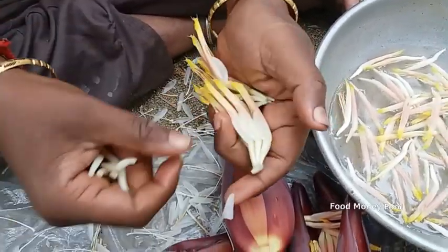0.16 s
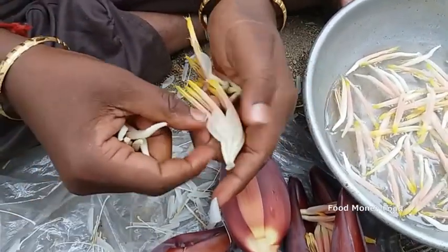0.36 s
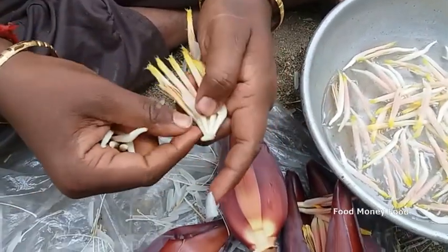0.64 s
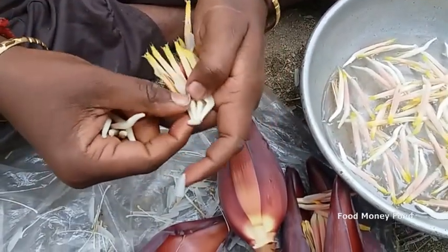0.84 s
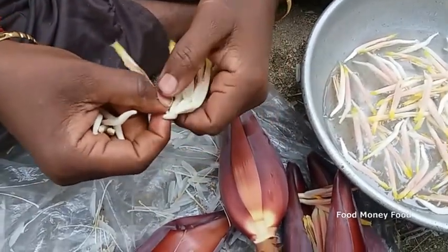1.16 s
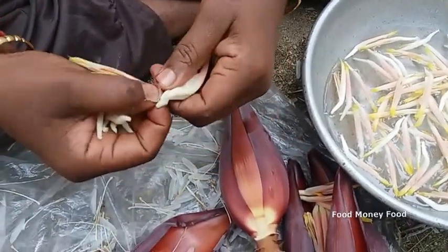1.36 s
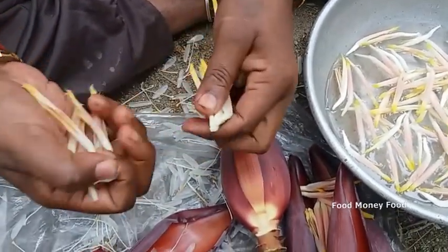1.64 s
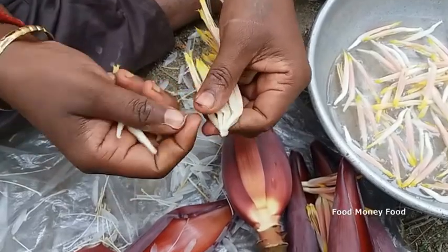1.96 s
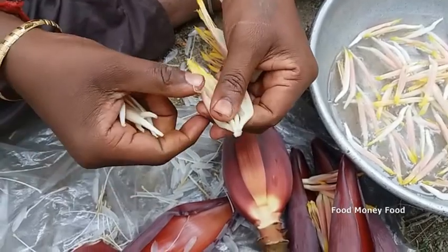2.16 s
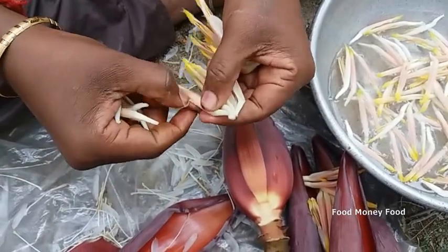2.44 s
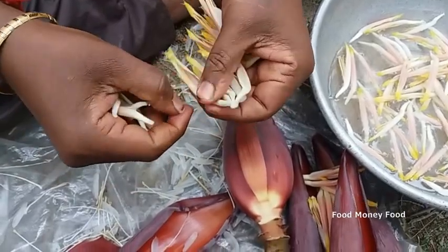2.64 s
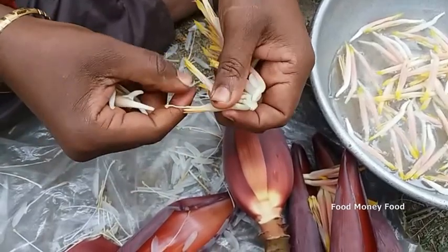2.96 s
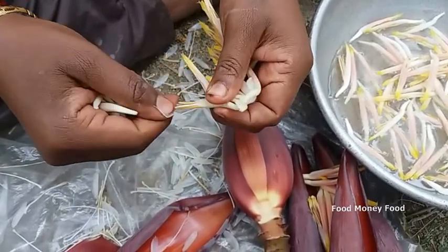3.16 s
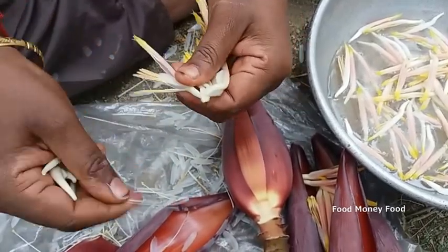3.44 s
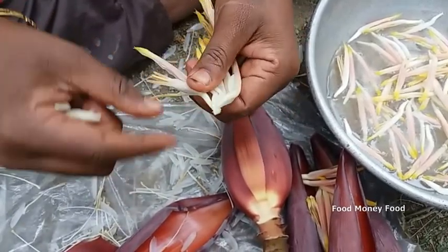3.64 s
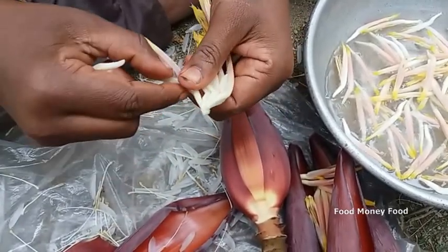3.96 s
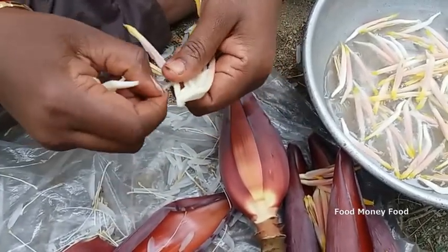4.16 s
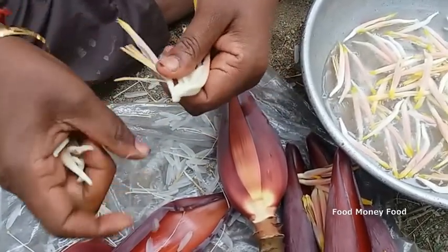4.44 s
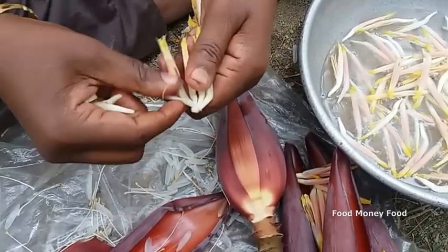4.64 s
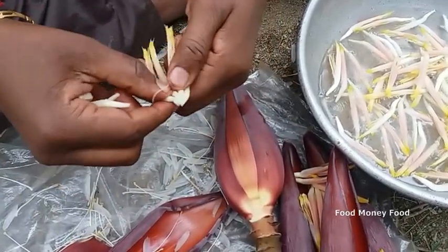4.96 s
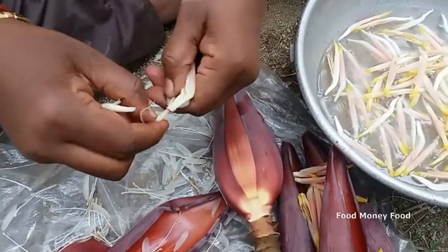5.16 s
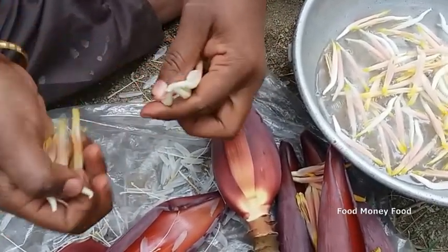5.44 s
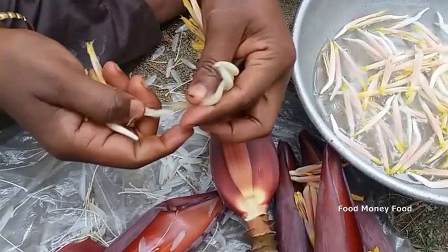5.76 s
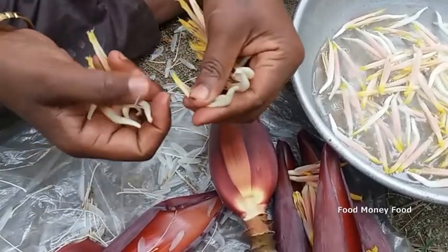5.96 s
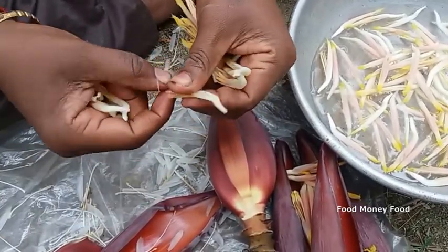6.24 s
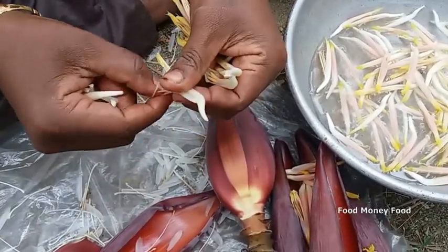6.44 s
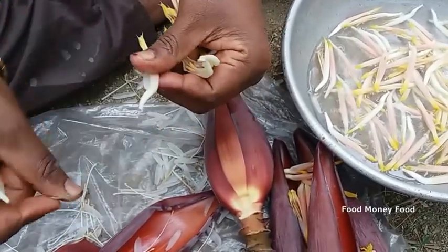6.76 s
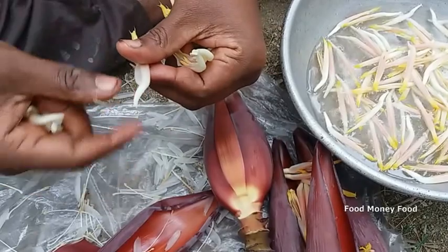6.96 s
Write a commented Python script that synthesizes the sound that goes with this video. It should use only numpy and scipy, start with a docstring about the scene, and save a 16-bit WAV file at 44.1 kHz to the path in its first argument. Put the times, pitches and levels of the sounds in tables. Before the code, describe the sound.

Small wet snaps of flower stalks picked apart by hand, with five raspy crow caws and an engine chugging far off.

```python
"""Outdoors in a yard, hands pick banana florets apart close by: stalks snap wetly and ring for an
instant, petals rub, fingers knock softly. Some way off a crow caws five times, a rasping arched tone
through its throat; a second bird hisses, a third whistles thinly, and all three echo. A distant
single-cylinder engine chugs with exhaust puffs and valve clatter, over open air and a low rumble."""
import sys
import numpy as np
from scipy import signal
from scipy.fft import rfft, irfft, next_fast_len
from scipy.io import wavfile
from scipy.ndimage import uniform_filter1d

SR = 44100
rng = np.random.default_rng(int(sys.argv[2]) if len(sys.argv) > 2 else 0)


def dump_mix(stems):
    """Bounce the given channels to the path in sys.argv[1] as a 16-bit WAV at rate SR."""
    frames = np.atleast_2d(stems).T  # one column per channel
    limited = np.clip(frames, -1, 1)  # hard clip at full scale
    pcm = np.round(limited * 32767).astype(np.int16)
    wavfile.write(sys.argv[1], SR, pcm)


N = 312669
TIME = np.arange(N) / SR


def from_db(db):
    """Decibels to gain."""
    return 10 ** (np.asarray(db) / 20)


def rms_one(x):
    """Scale to unit rms."""
    return x / np.sqrt(np.mean(x ** 2) + 1e-20)


def shaped(x, spectrum):
    """Filter by an (f/Hz, level/dB) table, -40 dB/octave beyond its ends; rms 1."""
    size = next_fast_len(len(x))
    hz, db = np.transpose(spectrum)
    octave = np.log2(np.maximum(np.fft.rfftfreq(size, 1 / SR), 1))
    outside = np.abs(octave - np.clip(octave, np.log2(hz[0]), np.log2(hz[-1])))
    gain = from_db(np.interp(octave, np.log2(hz), db) - 40 * outside)
    return rms_one(irfft(rfft(x, size) * gain, size)[:len(x)])


def coloured(spectrum):
    """Noise of a given spectrum; rms 1."""
    return shaped(rng.standard_normal(N), spectrum)


def drift(rate_hz):
    """Low-passed random wander; rms 1."""
    r = np.exp(-40 * np.pi * rate_hz / SR)  # runs at SR / 20
    slow = signal.lfilter([1], [1, -2 * r, r * r], rng.standard_normal(N // 20 + 2002))[2000:]
    return np.interp(np.arange(N) / 20, np.arange(len(slow)), rms_one(slow))


def ring(x, hz, t60_s):
    """One mode: a unit click starts a decaying sine of height 1."""
    r, w = from_db(-60 / (t60_s * SR)), 2 * np.pi * hz / SR
    return signal.lfilter([0, np.sin(w)], [1, -2 * r * np.cos(w), r * r], x + 1e-18)


def clicks(times_s, gains):
    """One impulse at each time."""
    at = np.round(np.asarray(times_s) * SR).astype(int)
    inside = (at >= 0) & (at < N)
    return np.bincount(at[inside], np.asarray(gains)[inside], N)


def fading(x, fade_s):
    """Each click becomes a decaying envelope."""
    return signal.lfilter([1], [1, -np.exp(-1 / (fade_s * SR))], x + 1e-18)


def note(start_s, length_s, db, change_db, attack_s, release_s):
    """Note envelope: attack, sloping hold, release."""
    t = TIME - start_s
    gate = np.clip(np.minimum(t / attack_s, (length_s - t) / release_s), 0, 1)
    return from_db(db + change_db * np.clip(t / length_s, 0, 1)) * gate


def arc(t, top_s, length_s, first, top, last, rise_power, fall_power):
    """Arch through first, top, last; power 2 is a parabola, higher is flatter."""
    rise = np.maximum(top_s - t, 0) / max(top_s, 1e-3)
    fall = np.maximum(t - top_s, 0) / max(length_s - top_s, 1e-3)
    return top + (first - top) * rise ** rise_power + (last - top) * fall ** fall_power


def background(air_db=-55, rumble_db=-56, treble_db=-66, stir_db=0.78, gust_db=-0.5, flicker_db=1.1):
    """Open air, an uneven low rumble and a thin high hiss."""
    # noise spectra: f/Hz, level/dB
    air_colour = [(150, -3.5), (260, 3), (290, -2), (714, -5.5), (877, -1.5), (913, -7.5), (1030, -6),
                  (1120, -5.5), (1780, -3), (2130, -7), (2720, -4.5), (4160, -12.5), (6800, -23.5),
                  (8840, -83), (15000, -120)]
    rumble_colour = [(30, -38), (42, -11.5), (58, -4), (85, 2.5), (130, -7), (220, -7), (330, -31)]
    treble_colour = [(5500, -25), (6900, -14), (7500, -6.5), (7950, 0), (8500, -7.5), (9200, -15),
                     (10200, -15), (11000, -12.5), (13200, -17.5), (15600, -15)]
    air = from_db(air_db + stir_db * drift(57)) * coloured(air_colour)
    rumble = from_db(rumble_db + gust_db * drift(8.8)) * coloured(rumble_colour)
    treble = from_db(treble_db + flicker_db * drift(17)) * coloured(treble_colour)
    return air + rumble + treble


def each_cycle(cycles_s, offsets_s, levels_db, vary_db, slop_s):
    """A click pattern repeated each engine cycle, with random spread in level and time."""
    times_s = cycles_s[:, None] + offsets_s + slop_s * rng.standard_normal((len(cycles_s), len(offsets_s)))
    gains = from_db(levels_db + vary_db * rng.standard_normal(times_s.shape))
    return clicks(times_s.ravel(), gains.ravel())


def exhaust(cycles_s, puff_db=-44.5, puff_hz=130, pipe_hz=190, pipe_db=-10.5):
    """Each firing: one dull swing of pressure and a short ring of the pipe."""
    # puff and its wall returns: t in cycle/s, level/dB
    puffs = [(.0475, -.5), (.0573, 0), (.07, -.5), (.0804, -.5), (.0922, -8), (.0975, -11), (.107, -12)]
    t = np.arange(-SR // 50, SR // 50) / SR
    spread = (np.pi * puff_hz * t) ** 2
    swing = (2 * spread - 1) * np.exp(-spread)
    pipe = from_db(pipe_db) * np.cos(2 * np.pi * pipe_hz * t) * np.exp(-(t / .008) ** 2)
    arrivals = each_cycle(cycles_s, *np.transpose(puffs), vary_db=1.27, slop_s=0.00032)
    return from_db(puff_db) * signal.fftconvolve(arrivals, swing - pipe, "same")


def valve_gear(cycles_s, clank_db=-53, tick_db=-58, sharp_db=-54, sharp_share=0.3):
    """Valve gear and piston clank and tick; in some cycles the valve shuts sharply."""
    # contacts: t in cycle/s, clank/dB, tick/dB
    clatter = [(.0013, -4, -2.5), (0.011, -1.5, -41), (0.021, -1, -29), (0.0283, -4.5, -29), (.046, -3, -9),
               (.055, -24, -8)]
    # struck modes: f/Hz, level/dB, t60/s
    clank_modes = [(1460, -8, 0.009), (2543, -5.5, 0.033), (2721, 1, 0.037), (2782, -8, 0.058),
                   (2848, -10, 0.046), (3260, -13, .01)]
    # tick spectrum: f/Hz, level/dB
    tick_colour = [(2500, -11), (4600, 15.5), (6500, -12), (7600, 21.5), (8400, 20.5), (9500, -45),
                   (15000, -52)]
    offsets_s, clanks_db, ticks_db = np.transpose(clatter)
    knocks = each_cycle(cycles_s, offsets_s, clanks_db, vary_db=0, slop_s=0.00018)
    clank = sum(from_db(db) * ring(knocks, hz, t60_s) for hz, db, t60_s in clank_modes)
    shuts_sharply = rng.random(len(cycles_s)) < sharp_share
    taps = clicks(cycles_s + offsets_s[0], from_db(sharp_db) * shuts_sharply)
    taps += each_cycle(cycles_s, offsets_s, ticks_db + tick_db, vary_db=2, slop_s=0.00015)
    return from_db(clank_db) * clank + fading(taps, fade_s=0.0033) * coloured(tick_colour)


def engine(firing_hz=10.0993, first_cycle_s=0.0344):
    """One cylinder: exhaust and clatter each cycle, over steady ringing."""
    # governor hunting: t/s, cycle lag/s
    lag = [(0, -.0016), (2.3, -.001), (4.0, .0014), (5.7, .0012), (6.6, -.0023), (7.09, -.004)]
    # steady resonances: f/Hz, width/Hz, level/dB
    resonances = [(891, 20, -80), (1069, 5.3, -73), (383.4, 28, -72.5), (2504, 59, -80.5)]
    cycles_s = first_cycle_s + np.arange(-1, N / SR * firing_hz) / firing_hz
    cycles_s += np.interp(cycles_s, *np.transpose(lag))
    sound = exhaust(cycles_s) + valve_gear(cycles_s)
    for hz, width_hz, db in resonances:
        t60_s = np.log(1000) / np.pi / width_hz
        sound += from_db(db) * rms_one(ring(rng.standard_normal(N), hz, t60_s))
    return sound


def hissing_bird(rattle_db=2.8):
    """Harsh bursts of noise with a rattling level."""
    # hisses: t/s, length/s, level/dB, change by end/dB
    hisses = [(0.783, 0.12, -48.5, -5), (.908, .15, -50, -10.5), (1.215, 0.16, -51.5, 0)]
    # hiss spectrum: f/Hz, level/dB
    hiss_colour = [(1500, 2), (2400, -3.5), (3000, 0), (3450, 6), (3800, 3), (4250, 5.5), (4900, -8.5),
                   (6500, -18), (9000, -16), (13000, -53)]
    hiss = rms_one(coloured(hiss_colour) * from_db(rattle_db * drift(84)))
    return hiss * sum(note(*row, attack_s=0.033, release_s=0.041) for row in hisses)


def whistling_bird(waver=0.0077, sharp_hz=82.3, settle_s=0.0424, edge_s=0.015):
    """Faint sine notes that start sharp and settle."""
    # notes: t/s, length/s, level/dB, change by end/dB, settled f/Hz
    whistles = [(1.041, 0.197, -57, -4, 1378), (1.297, 0.13, -60.5, 17, 1374)]
    sound, unsteady = 0, 1 + waver * drift(54)
    for start_s, length_s, db, change_db, hz in whistles:
        pitch_hz = unsteady * (hz + sharp_hz * np.exp(-np.maximum(TIME - start_s, 0) / settle_s))
        envelope = note(start_s, length_s, db, change_db, edge_s, edge_s)
        sound += envelope * np.sin(2 * np.pi * np.cumsum(pitch_hz) / SR)
    return sound


def nasal_notch(x, depth_db, centre_hz=1290, width_hz=137):
    """Notch between the low throat resonances; a negative depth boosts."""
    hz = np.fft.rfftfreq(len(x), 1 / SR)
    gain = from_db(-depth_db * np.exp(-((hz - centre_hz) / width_hz) ** 2))
    return irfft(rfft(x) * gain, len(x))


def crow(swing=0.09, throb=0.24, jitter=0.0403, flutter_db=5, breath_db=-16, slack_db=3.5,
         clean_hz=370, raspy_hz=490, accent_hz=482, accent_width_hz=18, beak_s=0.014):
    """The syrinx's arched tone, shaken in pitch and level near 80 Hz, sounds through the throat."""
    # caws: t/s, length/s, level/dB, onset drop/dB, swell/s, fade/dB, accent/dB, first f/Hz, top f/Hz,
    # last f/Hz, time to top/s, rasp/Hz, roughness 0-1, harmonic 2/dB, harmonic 4/dB, notch depth/dB
    caws = [(.329, 0.24, -39.5, 15, 0.15, 8, 5, 409.2, 543, 472, 0.16, 88.94, 0.66, .5, 3.5, -2),
            (1.366, 0.23, -42, 11, 0.12, -0.5, -4.5, 439.4, 530.7, 472.5, .12, 84.5, 0.69, -3.5, 2.5, -3),
            (2.815, 0.22, -41.5, 15, .12, 5, 4.5, 566, 561, 414, .015, 83.85, 0.41, -2, 5, 3),
            (3.254, .237, -40, 21, 0.055, 9.5, -6, 407.7, 536.5, 358, .11, 80.7, .15, 4.5, 4.5, 14),
            (3.705, 0.21, -42.5, 13, .07, 4, 0.5, 403, 507, 343, 0.11, 79.9, 0.25, 1, 1.5, 8)]
    # throat response: f/Hz, level/dB
    throat = [(520, -62), (740, -8), (1090, -4), (1300, 0), (1480, 6.5), (1700, 1), (1950, 7), (2200, -8),
              (2550, -30), (3200, -26), (4000, -19.5), (4700, -31), (5600, -23), (8000, -49)]
    sound, wobble, unrest, flutter = np.zeros(N), drift(172), drift(47.5), drift(360)
    breath = coloured(throat)
    for (start_s, length_s, db, onset_db, swell_s, fade_db, accent_db, first_hz, top_hz, last_hz,
         top_s, rasp_hz, rough, second_db, fourth_db, notch_db) in caws:
        on = (TIME > start_s) & (TIME < start_s + length_s)
        t = TIME[on] - start_s
        arch_hz = arc(t, top_s, length_s, first_hz, top_hz, last_hz, rise_power=2.8, fall_power=3.3)
        swell_db = arc(t, swell_s, length_s, -onset_db, 0, -fade_db, rise_power=1.77, fall_power=1.63)
        # the sagging voice catches the throat's main resonance
        accent = (t > top_s) * np.exp(-((arch_hz - accent_hz) / accent_width_hz) ** 2)
        beak = np.clip(np.minimum(t, length_s - t) / beak_s, 0, 1)
        effort = from_db(db + swell_db + accent_db * accent) * beak
        # rasp grows with tension: low notes are cleaner
        tension = np.clip((arch_hz - clean_hz) / (raspy_hz - clean_hz), 0, 1)
        rasp_phase = 2 * np.pi * np.cumsum(rasp_hz * (1 + 0.303 * rough * unrest[on])) / SR
        pitch_hz = arch_hz * (1 + tension * (swing * np.sin(rasp_phase) + jitter * rough * wobble[on]))
        phase = 2 * np.pi * np.cumsum(pitch_hz) / SR
        syrinx = sum(from_db(second_db * (k == 2) + fourth_db * (k == 4))
                     * np.sin(k * phase + rng.uniform(0, 2 * np.pi)) for k in range(1, 15))
        tone = nasal_notch(shaped(syrinx, throat), notch_db)
        # levelled over 10 ms, so loudness follows effort
        tone /= np.sqrt(uniform_filter1d(tone ** 2, size=SR // 100) + 1e-12)
        voice = tone + rough * from_db(breath_db) * breath[on]
        # the syrinx opens once per rasp cycle, widest on the downward slide
        opening = 1 - throb * tension * np.cos(rasp_phase + 0.61)
        opening *= from_db(flutter_db * rough * flutter[on] + slack_db * (1 - tension))
        sound[on] += rms_one(opening * voice) * effort
    return sound


def yard(x, scatter_db=-7, t60_s=0.63, build_s=0.045):
    """Direct sound, a few echoes and a thin tail scattered by trees."""
    # reflections: delay/s, level/dB
    echoes = [(.019, -9.5), (0.049, -38), (.112, -24), (0.171, -31)]
    t = TIME[:SR]
    tail = rng.standard_normal(SR) * from_db(-60 * t / t60_s) * (1 - np.exp(-t / build_s))
    response = from_db(scatter_db) * tail / np.linalg.norm(tail)
    for delay_s, db in echoes:
        response[int(delay_s * SR)] += from_db(db)
    return x + signal.fftconvolve(x, response)[:N]


def handling(rebound_s=0.0033):
    """Hollow finger knocks, each with a rebound, and low bumps."""
    # knocks: t/s, level/dB, rebound/dB
    knocks = [(4.512, -35, -22), (4.6652, -43.5, -1), (6.9601, -32.5, 1.5)]
    # knocked modes: f/Hz, level/dB, t60/s
    knock_modes = [(890, -30, .0057), (1328, 3, 0.017), (1760, -1.5, 0.012), (3420, -5, 0.0061)]
    # bumps: t/s, half-width/s, f/Hz, level/dB
    bumps = [(1.037, 0.01, 93, -33), (4.29, 0.011, 68.66, -43), (5.095, 0.0078, 101.5, -37),
             (5.25, 0.046, 71.1, -45.5), (5.32, 0.021, 101.5, -40.5), (5.39, 0.014, 75, -40.5),
             (5.755, 0.024, 95.3, -42.5), (6.145, 0.021, 66, -46), (7.018, 0.02, 91.5, -37.5)]
    times_s, knock_db, rebound_db = np.transpose(knocks)
    touches = clicks(times_s, from_db(knock_db))
    touches += clicks(times_s + rebound_s, from_db(knock_db + rebound_db))
    sound = sum((-1) ** k * from_db(db) * ring(touches, hz, t60_s)
                for k, (hz, db, t60_s) in enumerate(knock_modes))
    for at_s, width_s, hz, db in bumps:
        t = TIME - at_s
        sound += from_db(db) * np.exp(-(t / width_s) ** 2) * np.sin(2 * np.pi * hz * t)
    return sound


def floret_crackle(crackle_db=7.6):
    """Fine crackle: petal rubs, plus a brief bright splintering burst on one stalk snap."""
    # petal rubs and, at 3.332 s, the splintering: t/s, half-width/s, level/dB
    bursts = [(1.617, 0.011, -60), (1.852, 0.015, -56), (2.448, 0.022, -71), (3.332, 0.004, -53),
              (4.435, .008, -69), (5.285, .014, -61), (5.498, .019, -56), (5.775, .033, -63),
              (6.343, 0.01, -64)]
    # crackle spectrum: f/Hz, level/dB
    crackle_colour = [(3000, -12), (5000, -6.5), (9500, -11), (11200, -2.5), (13000, -12), (15500, -10)]
    envelope = sum(from_db(db) * np.exp(-((TIME - at_s) / width_s) ** 2) for at_s, width_s, db in bursts)
    return envelope * rms_one(coloured(crackle_colour) * from_db(crackle_db * drift(300)))


def stalk_snaps(gain_db=-3.5, splinter_db=-21, bright_db=15):
    """Each floret stalk breaks with a click and brief splintering that ring its modes."""
    # snaps: t/s, level/dB, crisp top/dB, low body/dB
    snaps = [(1.8716, -43, 0, -18), (2.5305, -36, -3.5, -9), (2.7469, -30.5, -11.5, -25),
             (2.8868, -29.5, -13.5, -7.5), (3.3128, -47, -3, -16), (3.3234, -46, -4, -17),
             (3.3327, -28, -9, -19), (4.282, -40, -24, -13), (4.51, -43, -19, -14), (5.2908, -42, -10, -13),
             (5.504, -43, -9, -14), (5.7725, -39, -10, -20), (6.6674, -22.5, -12.5, -25)]
    # stalk modes: f/Hz, level/dB, t60/s
    snap_modes = [(3270, 0, .004), (5360, 9, 0.0018), (8150, -8, 0.026), (8810, -5.5, 0.004),
                  (10900, -6.5, 0.003), (12700, -15, 0.0041), (15400, -18, 0.0033)]
    times_s, db, top_db, body_db = np.transpose(snaps)
    sound = 0
    for hz, mode_db, t60_s in snap_modes:
        colour_db = body_db * (hz < 6500) + (top_db + bright_db) * (hz > 10000)
        breaks = clicks(times_s, from_db(db + mode_db + colour_db))
        splinters = from_db(splinter_db) * fading(breaks, fade_s=0.0025) * rng.standard_normal(N)
        sound += ring(breaks + splinters, hz, t60_s)
    return from_db(gain_db) * sound


def scene():
    """Birds across the yard, engine beyond, hands close by; mono."""
    birds = yard(crow() + hissing_bird() + whistling_bird())
    return (birds + engine() + stalk_snaps() + floret_crackle() + handling() + background())[None]


def record(dry):
    """Steep low-pass."""
    cutoff_hz = 15900
    return signal.sosfilt(signal.ellip(12, .1, 70, cutoff_hz, fs=SR, output="sos"), dry)


dry = scene()
out = record(dry)
dump_mix(out)
```